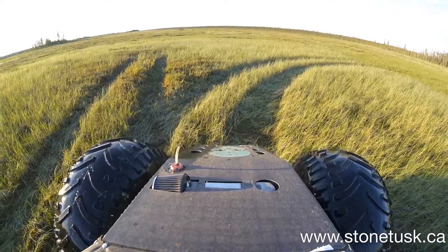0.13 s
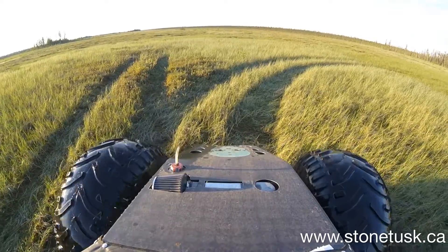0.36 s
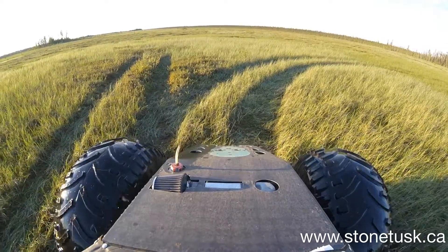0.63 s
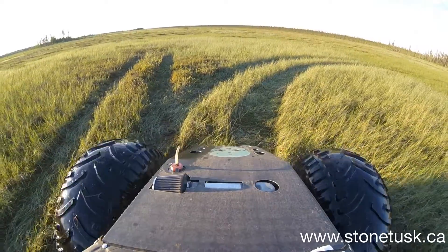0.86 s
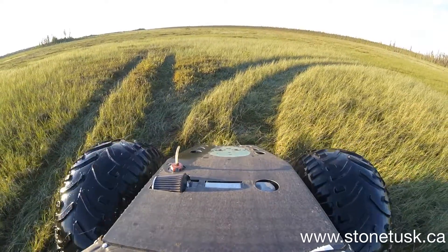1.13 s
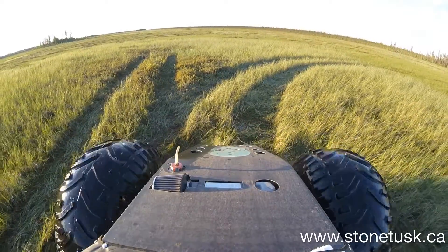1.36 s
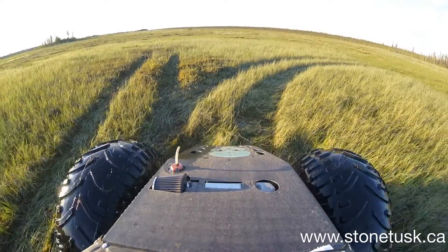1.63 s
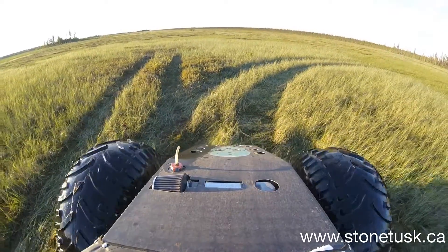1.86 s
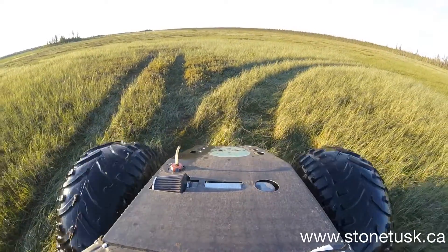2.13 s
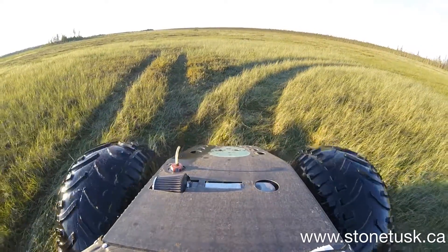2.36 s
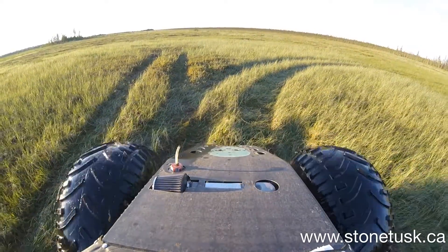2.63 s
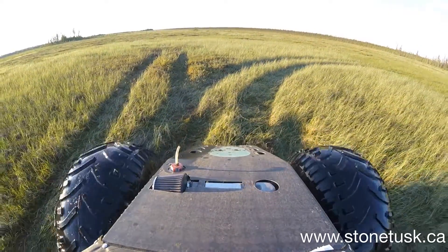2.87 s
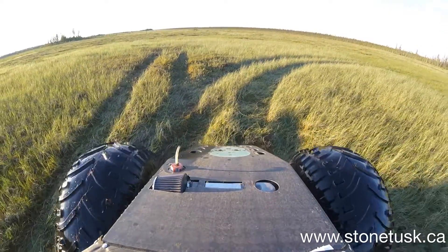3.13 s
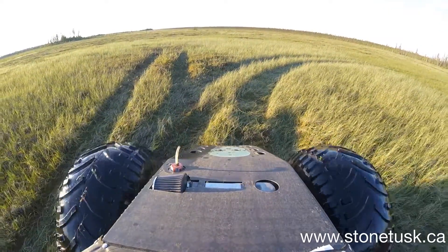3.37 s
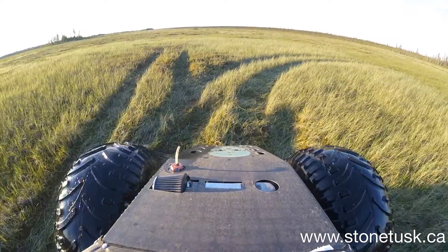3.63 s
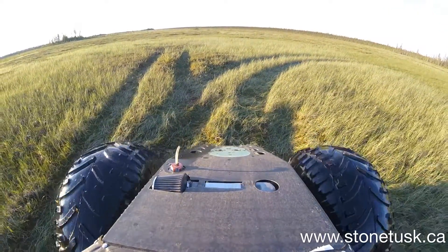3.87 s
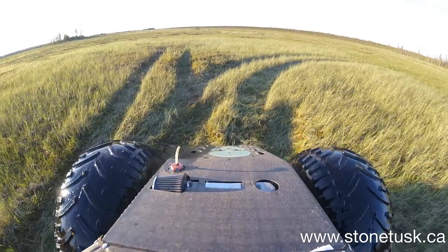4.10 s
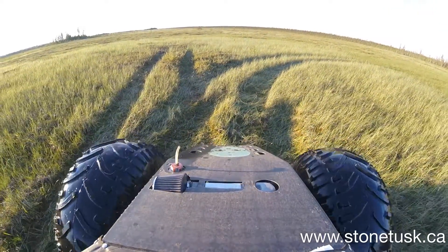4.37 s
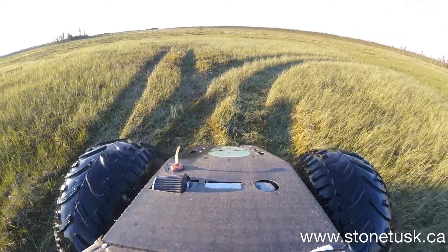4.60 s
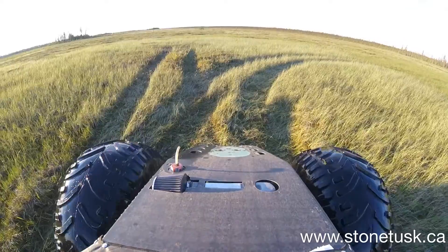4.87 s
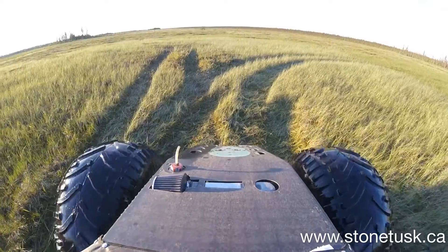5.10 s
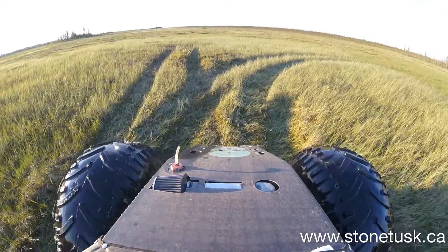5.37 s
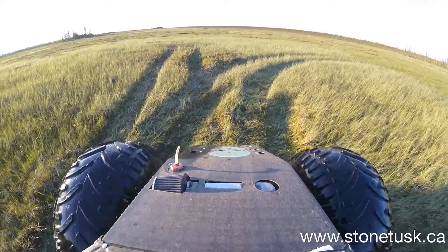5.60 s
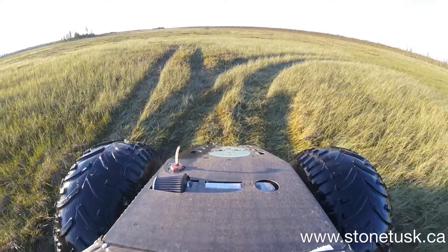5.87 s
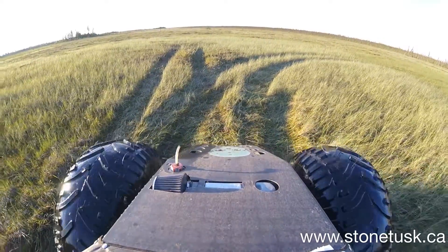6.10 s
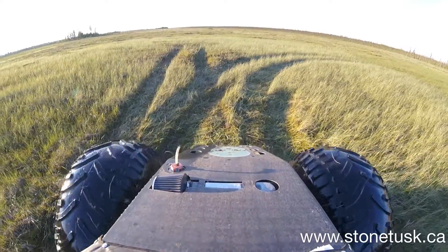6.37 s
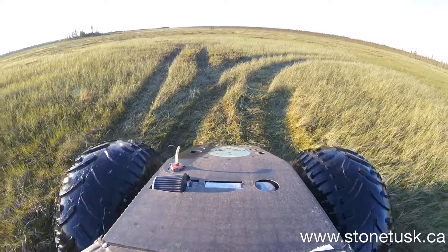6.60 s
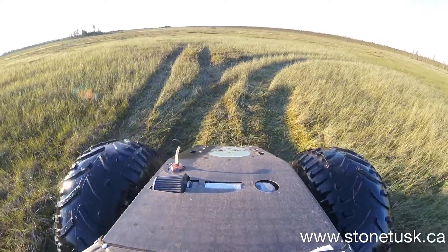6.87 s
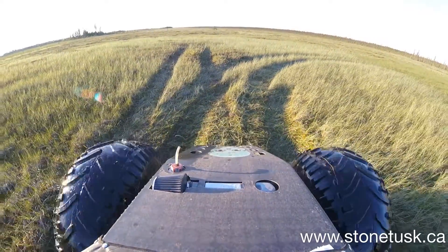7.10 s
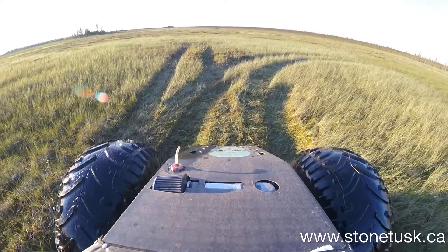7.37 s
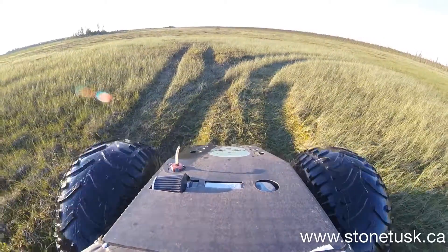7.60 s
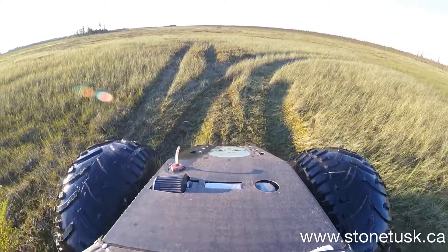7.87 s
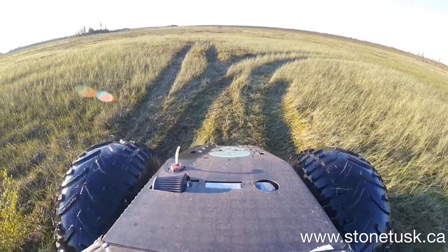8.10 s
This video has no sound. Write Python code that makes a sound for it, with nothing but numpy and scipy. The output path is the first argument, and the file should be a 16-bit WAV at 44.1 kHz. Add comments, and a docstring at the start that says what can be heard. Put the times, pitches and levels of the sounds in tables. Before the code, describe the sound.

A big-wheeled diesel vehicle crawls across an open grassy field, heard from a microphone on its deck. The deep, uneven exhaust throb dominates throughout, its speed wavering and sagging when it labours. Valve and injector clatter rides on top, the hull rumbles in swells and jolts, and a driveline howl rises and falls with a few brief moans.

```python
"""An uneven diesel throb runs throughout, loudest in the mix: a four-cylinder marsh buggy crawls over soft grass,
heard from its deck. Paired blows and rebounds swell the exhaust tone and ring its pipe; noise bursts at crank
angles make the clatter. Resonant noise makes the hull rumble and a low chassis drone; gliding noise-blurred tones
make the howl of the drive line and a few moans near 550 Hz. An electric motor hums faintly in wavering sine tones."""
import sys
import numpy as np
from scipy import signal
from scipy.fft import rfft, irfft, next_fast_len
from scipy.io import wavfile
from scipy.ndimage import map_coordinates

SR = 44100
rng = np.random.default_rng(int(sys.argv[2]) if len(sys.argv) > 2 else 0)


def master_out(mix):
    """Clip the mix to full scale and print it as 16-bit PCM to the path in sys.argv[1]."""
    frames = np.transpose(np.atleast_2d(mix))
    ceiling = np.clip(frames, -1, 1)
    pcm = np.round(ceiling * 32767).astype(np.int16)
    wavfile.write(sys.argv[1], SR, pcm)


def amplitude_ratio(level_db):
    """Convert a level in decibels to the matching linear amplitude (field) ratio."""
    exponent = np.asarray(level_db, float) / 20
    return 10 ** exponent


N = 362943  # samples

# crank speed: (time [s], speed [rpm])
CRANK_SPEED = [(0, 1254.2), (.42, 1245.9), (1.01, 1315.5), (1.57, 1285.3), (1.9, 1323.1), (2.24, 1327.1),
               (2.73, 1191.2), (3.1, 1142.7), (4, 1226.1), (4.59, 1141), (5.08, 1295.9), (5.38, 1301.2),
               (5.94, 1237.8), (6.32, 1297.6), (6.89, 1294.5), (7.33, 1334.8), (7.8, 1307), (8.23, 1325)]
CYCLE_DEG = 720  # crank angle of one engine cycle
FAST_RPM, SLOW_RPM = 1304, 1170  # the two speeds at which the exhaust is described


def unit(x):
    """Scale to rms 1."""
    return x / np.sqrt(np.mean(x ** 2) + 1e-20)


def curves(rows):
    """One value per sample for each column after the time."""
    s, *columns = np.transpose(rows)
    return [np.interp(np.arange(N) / SR, s, column) for column in columns]


def wobble(rate):
    """A smooth random curve, rate knots a second."""
    knots = rng.standard_normal(int(N * rate / SR) + 4)
    return map_coordinates(knots, [np.arange(N) * rate / SR])


def filtered(x, response):
    """x passed through a complex response of frequency."""
    size = next_fast_len(N + 8192)
    spectrum = rfft(x, size) * response(np.fft.rfftfreq(size, 1 / SR))
    return irfft(spectrum, size)[..., :N]


def modes(table):
    """Causal sum of resonances with alternating signs, from rows of (centre [Hz], width [Hz], level [dB])."""
    def response(f):
        total = 0
        for k, (centre, width, db) in enumerate(table):
            resonance = 1j * f * width / (centre * centre - f * f + 1j * f * width)
            total = total + (-1) ** k * amplitude_ratio(db) * resonance
        return total
    return response


def fuzzy_tone(hz, db, steady, blur_hz):
    """A gliding tone inside a narrow band of noise; steady is the share of pure tone."""
    phase = 2 * np.pi * np.cumsum(hz) / SR
    in_phase = (steady + wobble(blur_hz)) * np.cos(phase)
    quadrature = wobble(blur_hz) * np.sin(phase)
    return amplitude_ratio(db) / np.sqrt(1 + steady ** 2 / 2) * (in_phase + quadrature)


def crank():
    """Engine cycles done at each sample; a cycle is two turns."""
    return np.cumsum(curves(CRANK_SPEED)[0]) / (120 * SR)


def strokes(cycles):
    """Pressure strokes done, their strength in dB and the engine's labour; a labouring engine is more uneven."""
    # pressure peaks of one cycle, a blow and its rebound in the pipe for each cylinder:
    # (crank angle [deg], strength at FAST_RPM [dB], strength at SLOW_RPM [dB])
    peaks = [(73, 2.6, 5.1), (173, .7, -3.7), (261.5, 2.3, 4), (346, -2.7, -3.2), (418.5, 4.5, 7.2),
             (526.5, .1, -5.1), (616, .5, 3.6), (711, -.2, -2.4)]
    deg, fast_db, slow_db = np.transpose(peaks)
    count = len(deg)

    def between(values, even):
        """Pass smoothly from peak to peak, round and round the cycle."""
        return map_coordinates(values, [count * even % count], mode="grid-wrap")

    # stretch the cycle, step by step, until the peaks are evenly spaced in it
    even = cycles
    for _ in range(6):
        even = cycles + between(np.arange(count) / count - deg / CYCLE_DEG, even)
    labour = (FAST_RPM - curves(CRANK_SPEED)[0]) / (FAST_RPM - SLOW_RPM)  # 0 at fast, 1 at slow
    strength_db = between(fast_db, even) + labour * between(slow_db - fast_db, even)
    return count * even, strength_db, labour


def exhaust(cycles):
    """An even firing tone under uneven blows and rebounds, dulled by the muffler; each blow's edge rings the pipe."""
    # (time [s], firing tone before its loss under labour [dB], octave before the stroke strength [dB])
    levels = [(0, -16.5, -13.5), (.9, -18, -13.8), (2.1, -18.5, -14.9), (2.6, -17, -16.1), (3.7, -17, -14),
              (4.6, -14.5, -14), (5.2, -16, -15), (5.8, -17, -14.6), (6.4, -17, -14.4), (7.4, -16.5, -15.2),
              (8.23, -16.5, -15)]
    # pipe resonances rung by the sharp edge of each blow: (centre [Hz], width [Hz], relative level [dB])
    pipe = [(164.3, 30.4, 0.5), (213.6, 48, -2.5), (330, 69, -15)]
    sag_db, thins_db = 3.6, 7  # loss per unit of labour, and a further loss below FAST_RPM only
    done, stroke_db, labour = strokes(cycles)
    tone_db, octave_db = curves(levels)
    tone_db = tone_db - sag_db * labour - thins_db * np.clip(labour, 0, 2) + .3 * wobble(15)
    tone = amplitude_ratio(tone_db) * np.cos(8 * np.pi * (cycles - 68 / CYCLE_DEG))  # four firings a cycle
    octave = amplitude_ratio(octave_db + stroke_db + 0.23 * wobble(17)) * np.cos(2 * np.pi * done)
    muffled = filtered(np.sqrt(2) * (tone + octave), lambda f: 1 / (1 + (f / 155) ** 12))
    blow = np.diff(np.floor(done / 2), prepend=0)  # one click for each blow and rebound pair
    edge = blow * amplitude_ratio(0.52 * stroke_db - 4.5 * labour + 1.5 * wobble(30))
    ringing = filtered(edge, lambda f: modes(pipe)(f) / (1 + (f / 600) ** 4))
    return muffled + amplitude_ratio(-37.0) * unit(ringing)


def block(f):
    """Colour of the mechanical noise: a broad slope, lifted at the block's resonances."""
    # broad mechanical noise: (frequency [Hz], relative density [dB per Hz])
    slope = [(10, -14), (60, -15), (150, -7.5), (260, -10.5), (700, -12), (1000, -19), (1600, -23.5),
             (3000, -24), (5200, -31.5), (7500, -35), (9500, -43), (11300, -48.5), (11800, -55.5),
             (13800, -62), (14500, -120)]
    # engine block resonances: (centre [Hz], width [Hz], lift [dB])
    resonances = [(1104, 96, 3), (1259, 70, 8), (2597, 310, 5), (2788, 200, 8), (3510, 190, 2.5),
                  (4110, 59, 5), (6120, 470, 5.5), (6486, 324, 11.5), (9800, 230, -2), (11000, 500, 2)]
    hz, db = np.transpose(slope)
    lift_db = sum(top_db / (1 + (2 * (f - c) / w) ** 2) for c, w, top_db in resonances)
    return amplitude_ratio(np.interp(np.log(f + 1), np.log(hz), db) + lift_db)


def clatter(cycles):
    """A steady racket with noise bursts of valves and injectors at fixed crank angles, varying every cycle."""
    # clacks in one engine cycle: (crank angle [deg], centre [Hz], width [Hz],
    # peak over the racket before filtering and a 0.5 dB lift [dB], rise [deg])
    clacks = [(112, 6500, 3600, 4, 32), (122, 3700, 900, 1, 20), (166, 3400, 2000, 7, 12),
              (295, 6300, 3400, 5, 30), (298, 3800, 1000, 5, 20), (312, 1700, 700, 3, 28),
              (454, 7600, 2600, 9, 7), (470, 6600, 3400, 5, 30), (490, 1300, 500, 2, 35),
              (500, 3800, 900, 2, 20), (530, 3300, 900, 6, 12), (640, 6200, 3400, 3, 30),
              (645, 2400, 700, 3, 12), (662, 3500, 1100, 7, 14), (686, 5900, 1300, 6, 12),
              (684, 1900, 600, 5, 20)]
    # level of the block's ring near 2.7 kHz: (time [s], change [dB])
    ring_change = [(0, -0.7), (2.4, 0), (3.8, 1.4), (4.8, -1), (8.23, 0.8)]
    drive = rng.standard_normal(N) * amplitude_ratio(0.25 * wobble(12))
    for deg, hz, width, db, rise in clacks:
        since = cycles - deg / CYCLE_DEG + 1
        size_db = db + .5 + 1.8 * rng.standard_normal(200)[since.astype(int)]  # one draw a cycle
        age = (since % 1) * CYCLE_DEG / rise
        burst = amplitude_ratio(size_db) * age * np.exp(1 - age) * rng.standard_normal(N)
        drive = drive + filtered(burst, lambda f: np.exp(-2 * ((f - hz) / width) ** 2))
    ring = filtered(drive, lambda f: np.exp(-2 * ((f - 2700) / 700) ** 2))
    drive = drive + (amplitude_ratio(curves(ring_change)[0]) - 1) * ring
    return amplitude_ratio(-33.5) * unit(filtered(drive, block))


def hull():
    """The ground shakes the panels: resonant noise in slow swells and quick jolts."""
    # rumble: (time [s], level before swells and jolts [dB])
    levels = [(0, -39), (.4, -35), (1.2, -36.5), (1.55, -32.5), (1.85, -28.5), (2.4, -37.5), (3.5, -36),
              (4.6, -38), (5.3, -36.5), (5.9, -40), (6.4, -35), (8.23, -35.5)]
    # hull panels: (centre [Hz], width [Hz], relative level [dB])
    panels = [(345, 94, -7.5), (449, 134, -6.5), (560, 41, 0), (611.7, 15.3, 1.5), (780, 230, -12)]
    noise = rng.standard_normal(N)
    rumble = unit(filtered(noise, lambda f: modes(panels)(f) / (1 + (f / 900) ** 4)))
    return amplitude_ratio(curves(levels)[0] + 1.2 * wobble(4) + 1.2 * wobble(12)) * rumble


def howl():
    """The drive line howls louder the faster it turns, up to a limit, with a broad roar above the tone."""
    # pitch, gliding with ground speed: (time [s], pitch [Hz])
    glide = [(0, 335), (.8, 340), (1.5, 385), (2.2, 468), (3.2, 375), (4.1, 368), (5, 322), (6.1, 408),
             (6.5, 465), (7.2, 490), (8.23, 448)]
    full_db, full_hz, loss_db_per_hz = -40.5, 403, 0.24  # full level from full_hz up; loss below it
    roar_db, roar_ratio = -1.5, 1.1  # roar against the tone: level, pitch ratio
    hz, = curves(glide)
    db = full_db - loss_db_per_hz * np.maximum(full_hz - hz, 0) + wobble(3)
    tone = fuzzy_tone(hz, db, steady=.7, blur_hz=40)
    roar = fuzzy_tone(roar_ratio * hz, db + roar_db, steady=0, blur_hz=130)
    return tone + roar


def moan():
    """A tone near 550 Hz moans, once strongly and three times faintly: each swells, sags in pitch and fades."""
    # (start [s], length [s], first pitch [Hz], level [dB])
    moans = [(0.098, .4, 574, -44), (1.603, 0.49, 590, -44), (4.05, 0.71, 580, -36.5),
             (7.147, 0.39, 560, -42.5)]
    rise_s, sag_hz, sag_s = .06, 40, .25  # swell and fade time; depth and time constant of the sag
    t, out = np.arange(N) / SR, 0
    for start, length, hz, db in moans:
        swell = np.clip(np.minimum(t - start, start + length - t) / rise_s, 0, 1)
        sunk_hz = sag_hz * (1 - np.exp(-np.maximum(t - start, 0) / sag_s))
        out = out + swell * fuzzy_tone(hz - sunk_hz, db, steady=3.5, blur_hz=14)
    return out


def chassis():
    """A low drone of the chassis: noise in two low resonances."""
    # (centre [Hz], width [Hz], relative level [dB])
    resonances = [(176, 14, -1), (202, 22, 0)]
    # (time [s], level [dB])
    levels = [(0, -41.5), (1.2, -45.5), (2, -40.5), (2.8, -52), (5.5, -48.5), (8.23, -56)]
    drone = unit(filtered(rng.standard_normal(N), modes(resonances)))
    return amplitude_ratio(curves(levels)[0]) * drone


def hum():
    """Electric motor: sine tones that waver in level and together, slightly, in pitch."""
    # (pitch [Hz], rms level before wavering [dB])
    tones = [(316, -47.5), (403, -45.5), (806, -52), (1208, -57.5), (2417, -62)]
    t = np.arange(N) / SR + np.cumsum(.0012 * wobble(5)) / SR
    out = 0
    for hz, db in tones:
        out = out + np.sqrt(2) * amplitude_ratio(db + 3 * wobble(8)) * np.sin(2 * np.pi * hz * t)
    return out


def scene():
    """All sources add up at one microphone on the deck, in the open."""
    cycles = crank()
    engine = exhaust(cycles) + clatter(cycles)
    vehicle = hull() + howl() + moan() + chassis() + hum()
    return (engine + vehicle)[None]


def top_cut(x):
    """Nothing passes above the cut-off."""
    return signal.sosfilt(signal.butter(12, 13500, fs=SR, output="sos"), x)


def record(dry):
    """The microphone weakens the deepest bass, below about 31 Hz."""
    heard = filtered(dry, lambda f: 0.16 + 0.94 / (1 + (31 / (f + 1)) ** 8))
    return top_cut(heard)


dry = scene()
out = record(dry)
master_out(out)
```